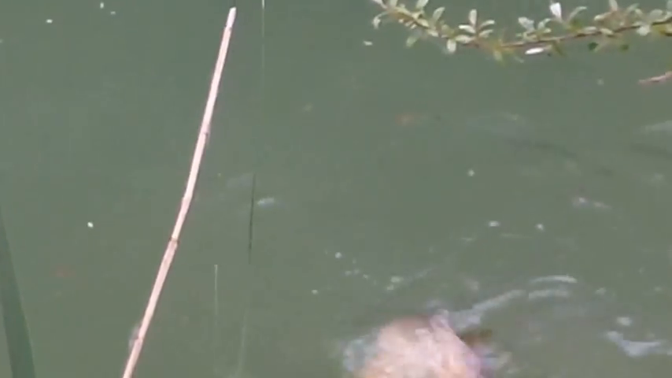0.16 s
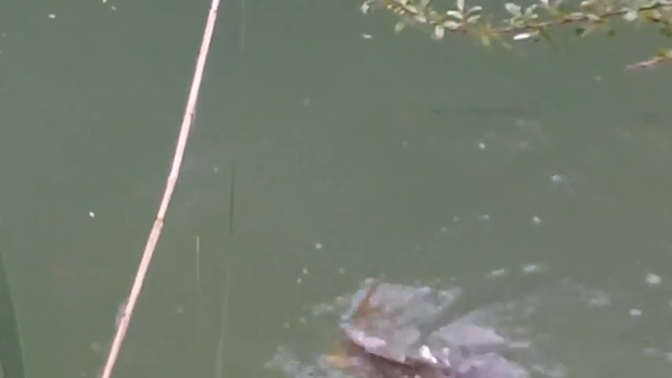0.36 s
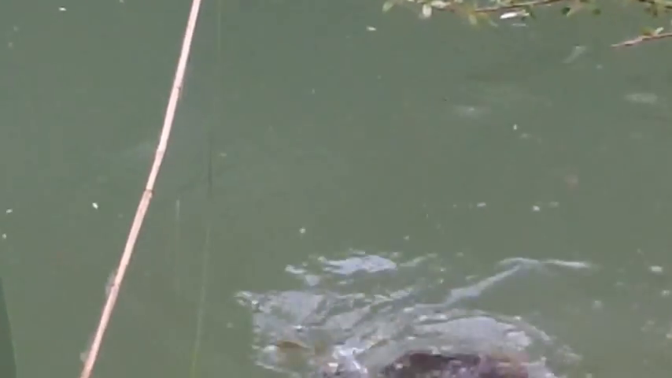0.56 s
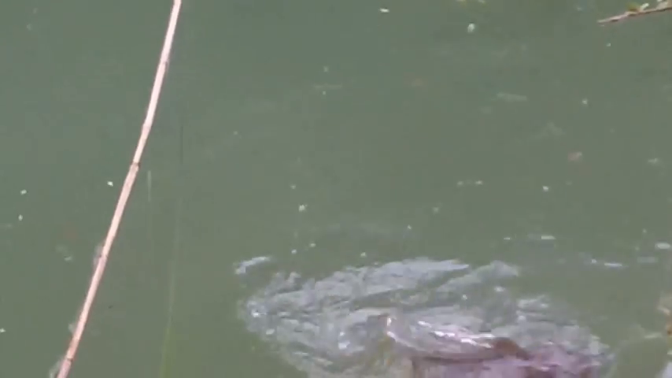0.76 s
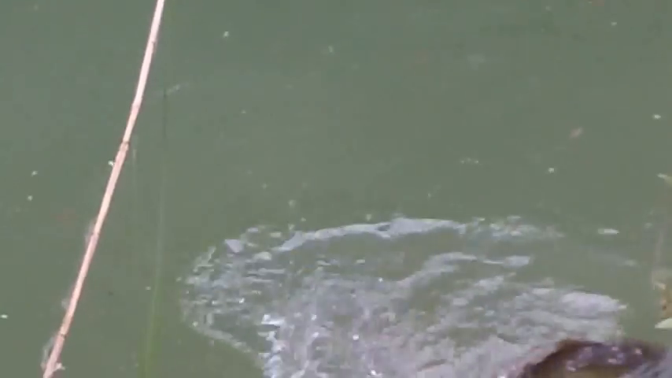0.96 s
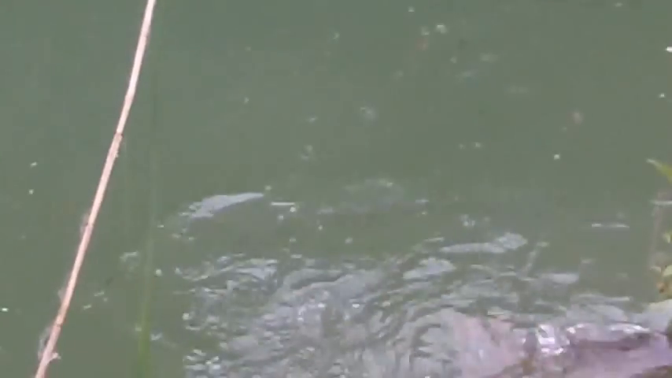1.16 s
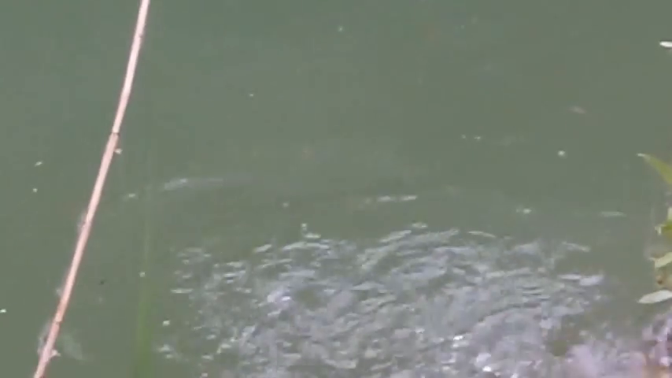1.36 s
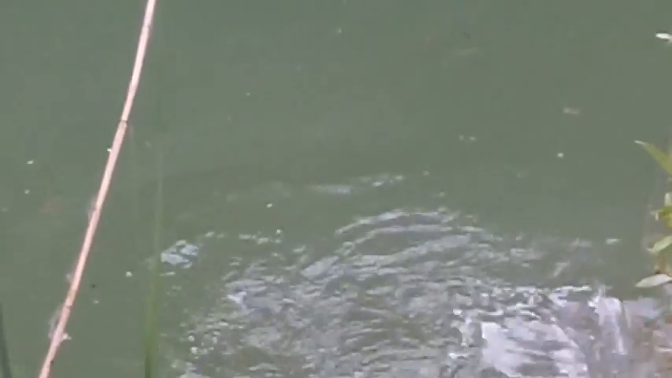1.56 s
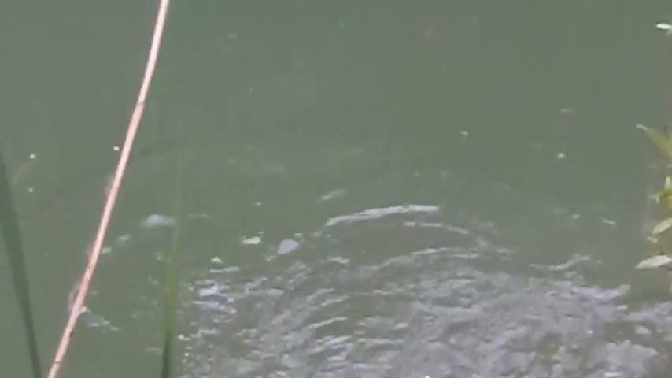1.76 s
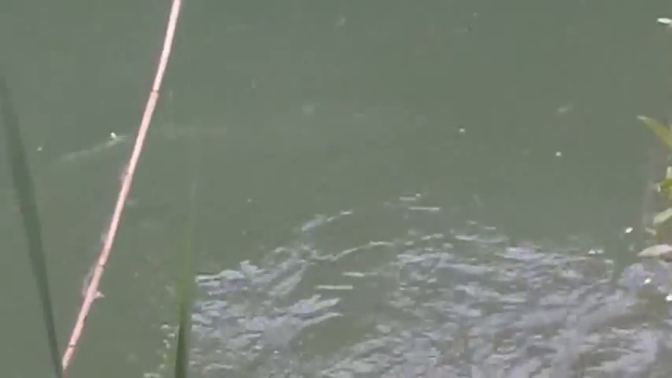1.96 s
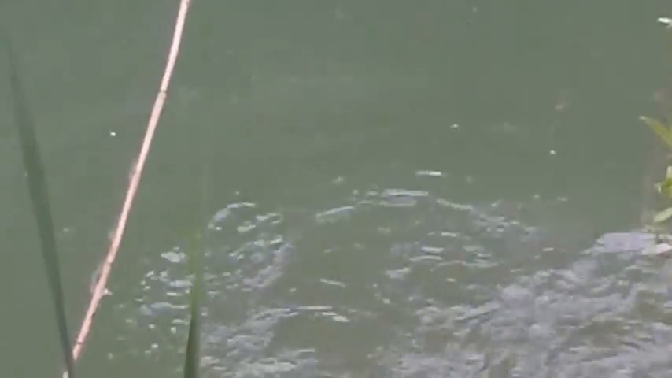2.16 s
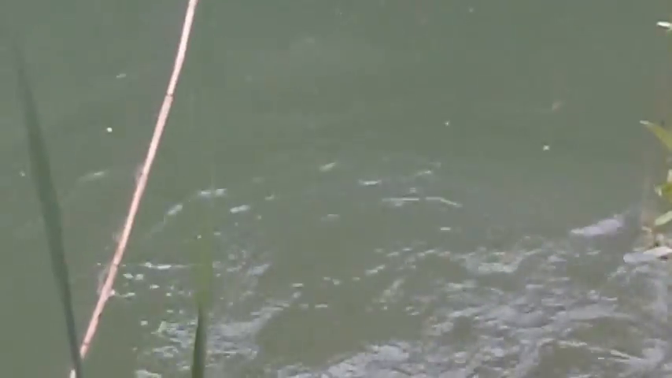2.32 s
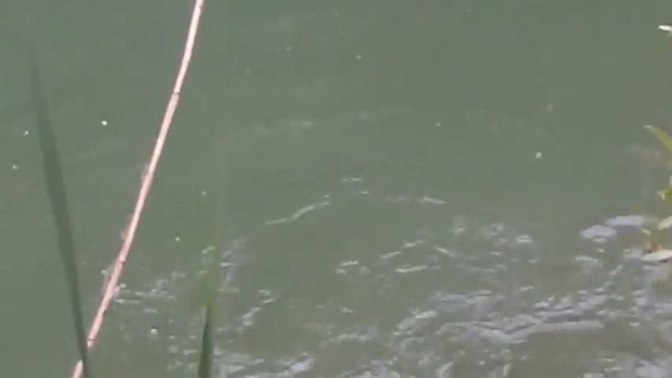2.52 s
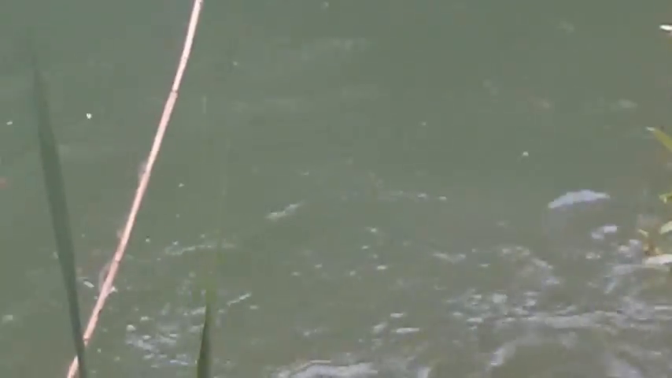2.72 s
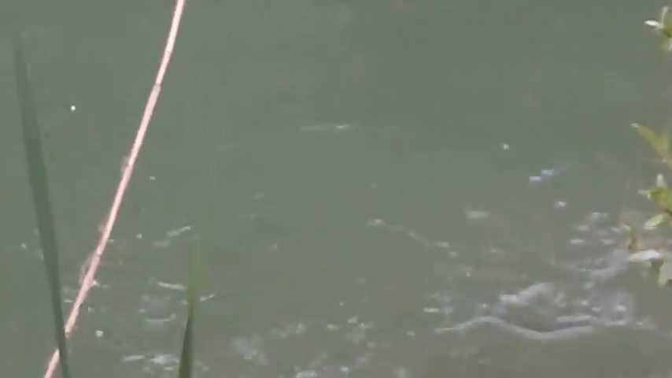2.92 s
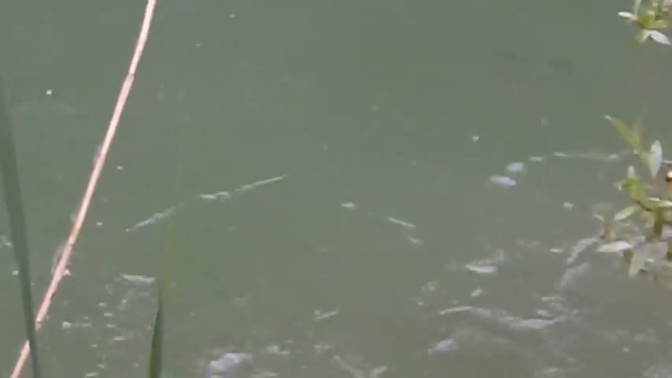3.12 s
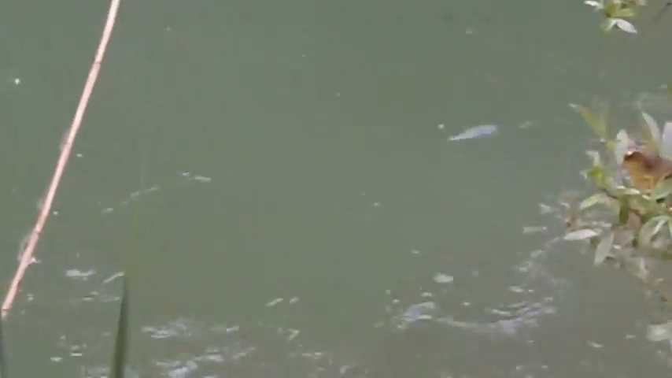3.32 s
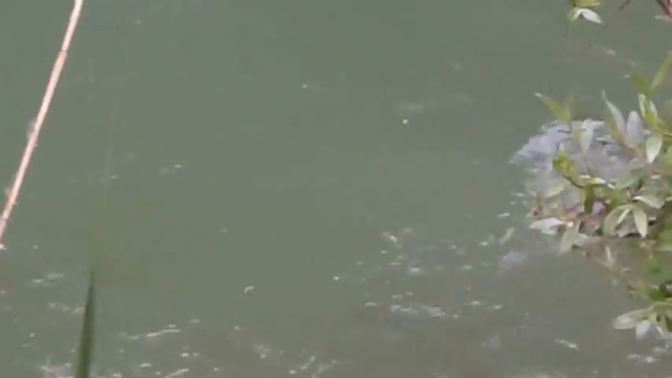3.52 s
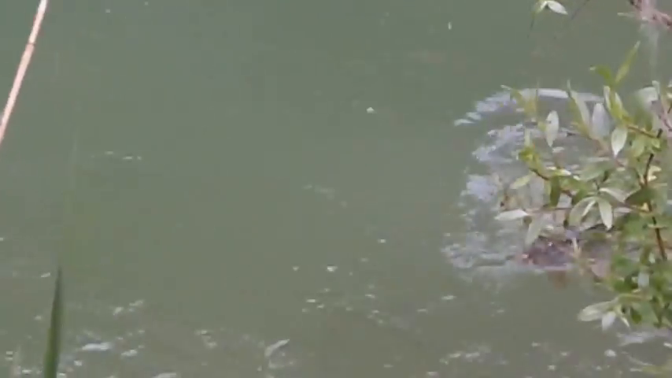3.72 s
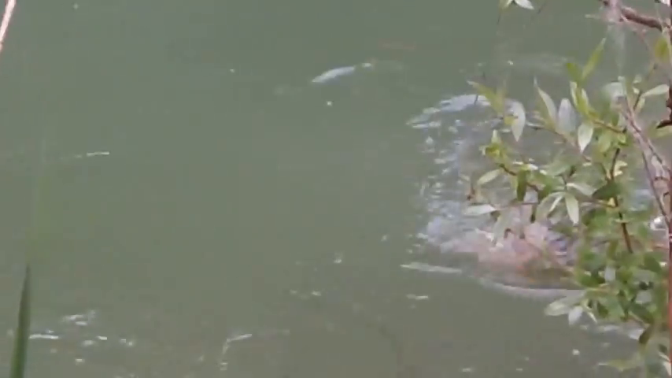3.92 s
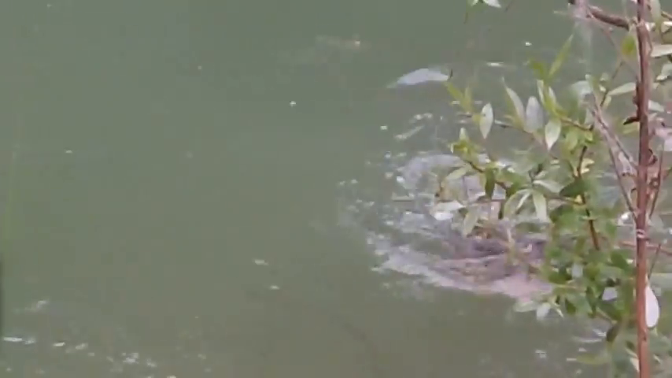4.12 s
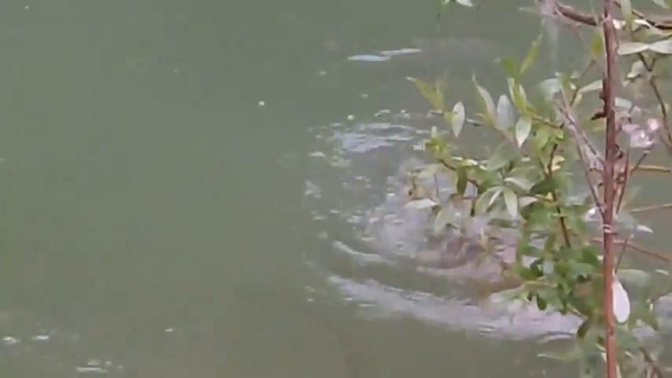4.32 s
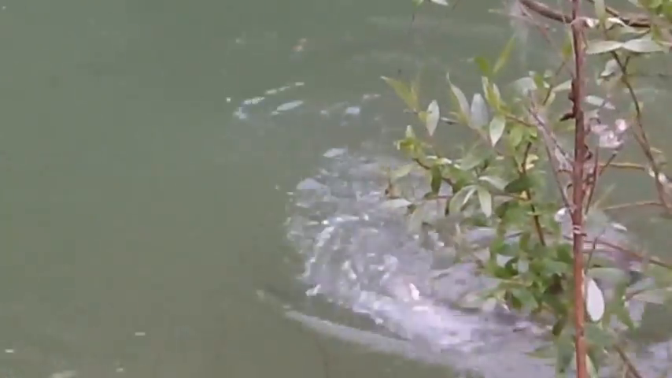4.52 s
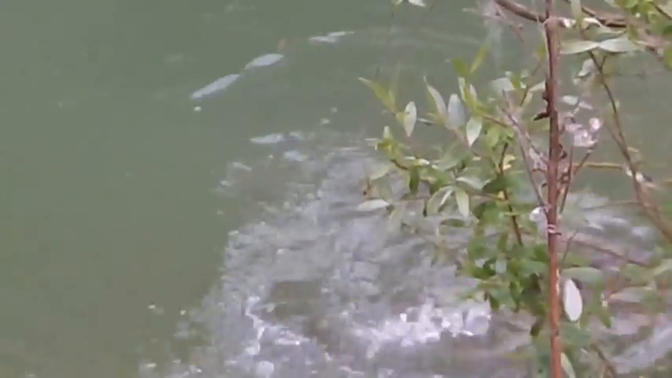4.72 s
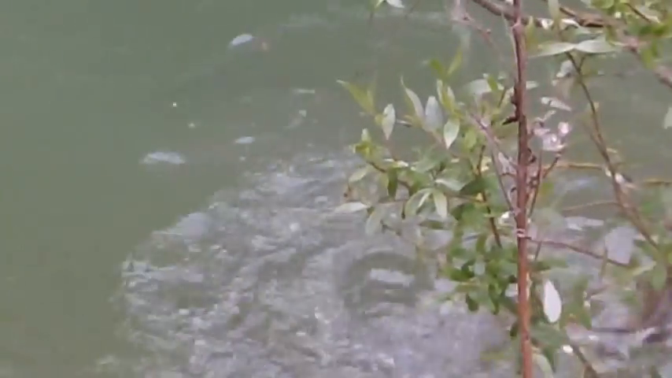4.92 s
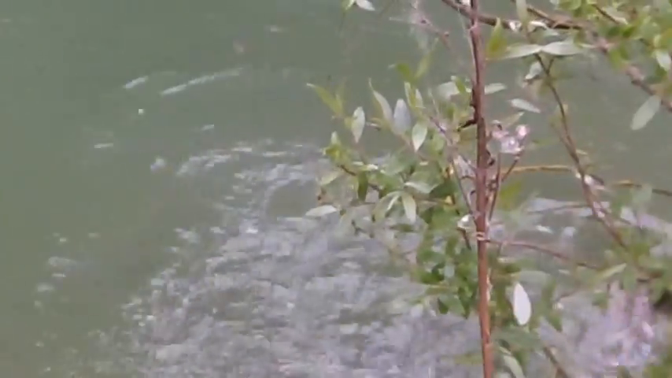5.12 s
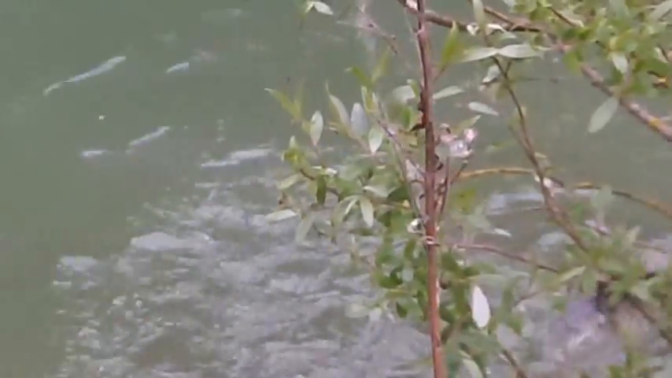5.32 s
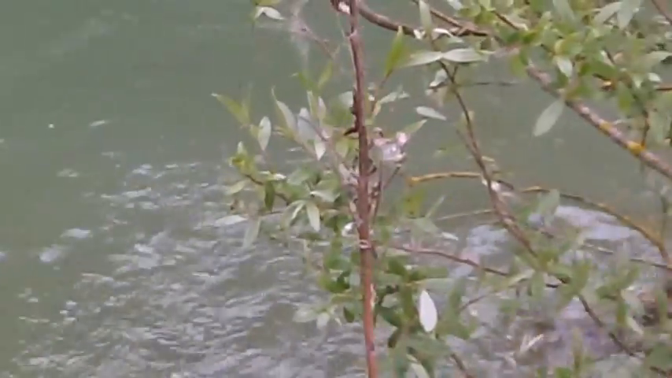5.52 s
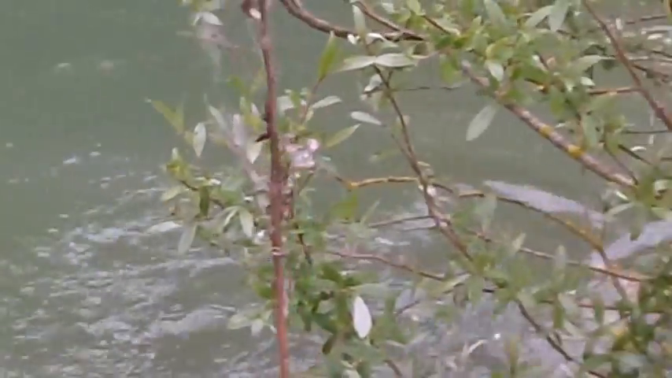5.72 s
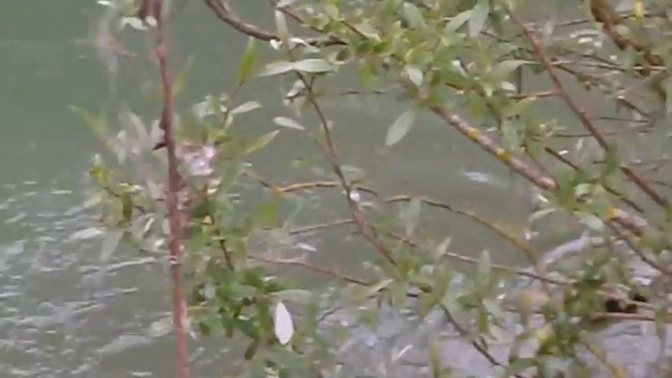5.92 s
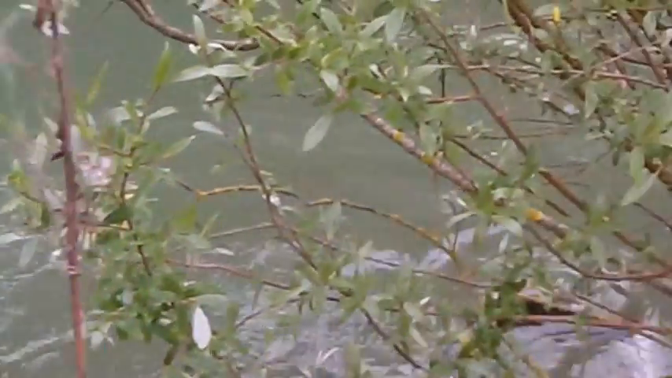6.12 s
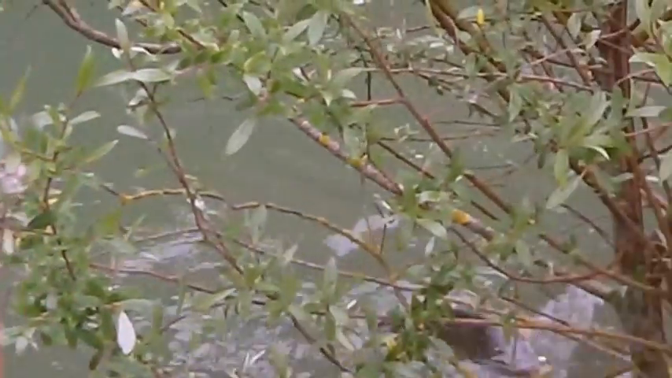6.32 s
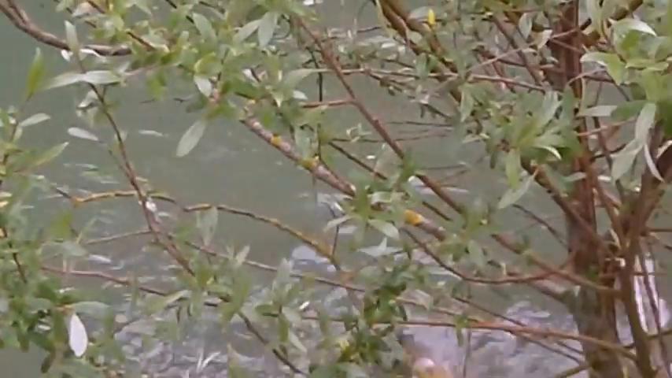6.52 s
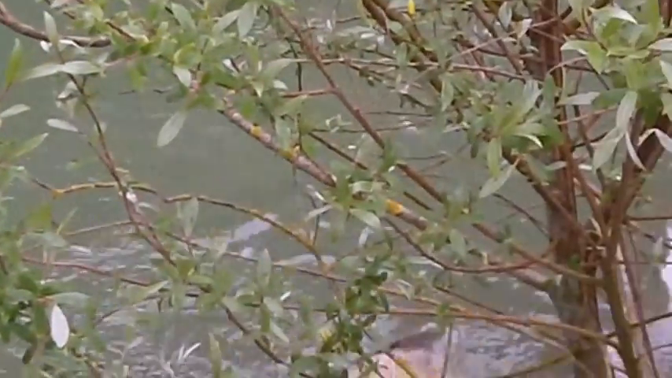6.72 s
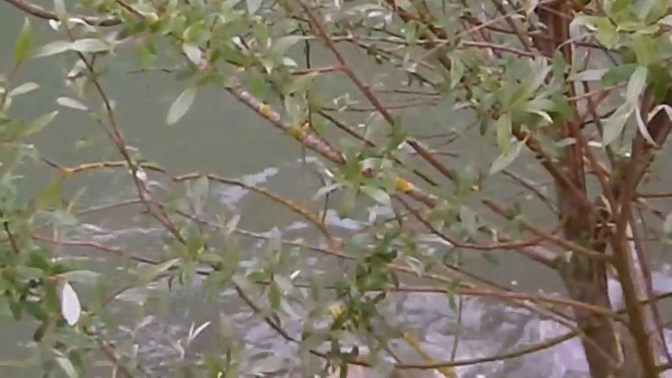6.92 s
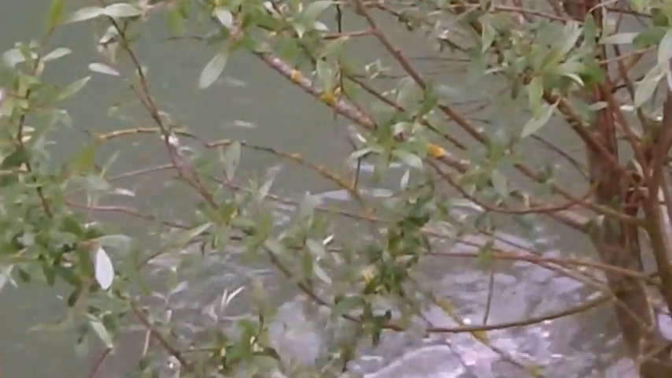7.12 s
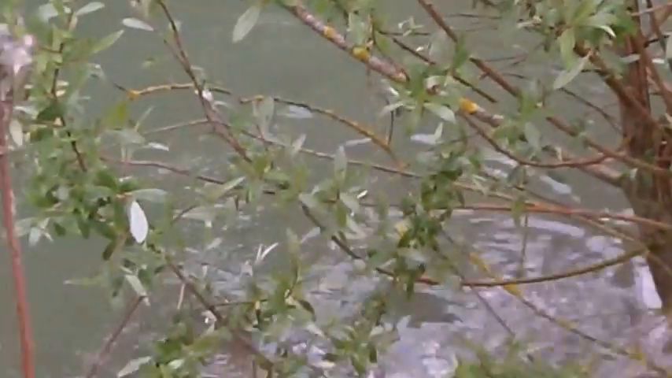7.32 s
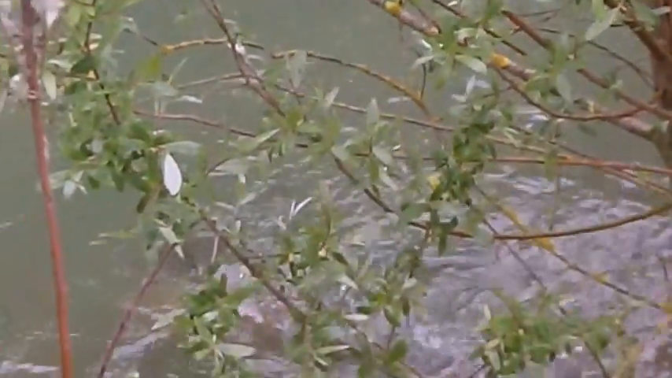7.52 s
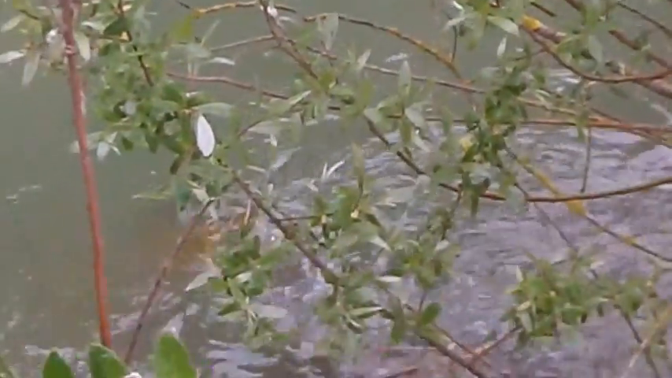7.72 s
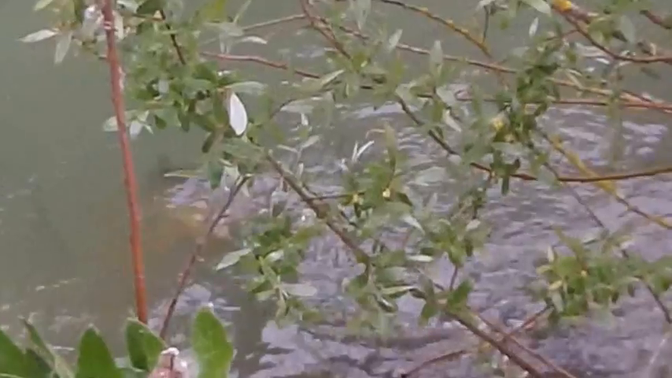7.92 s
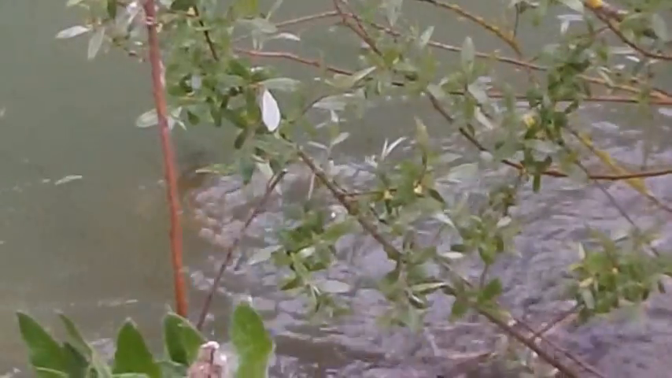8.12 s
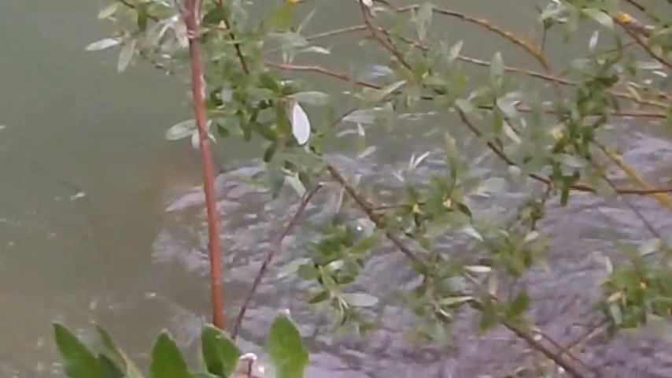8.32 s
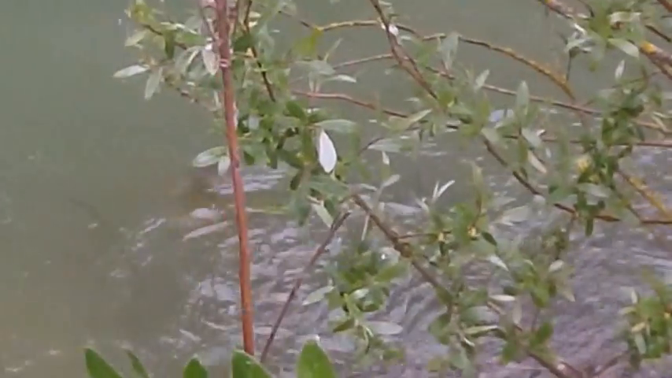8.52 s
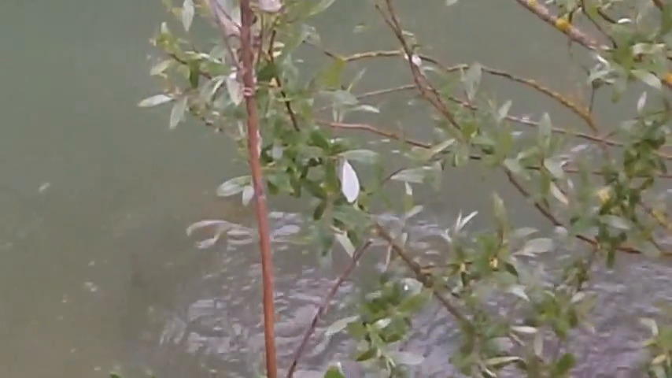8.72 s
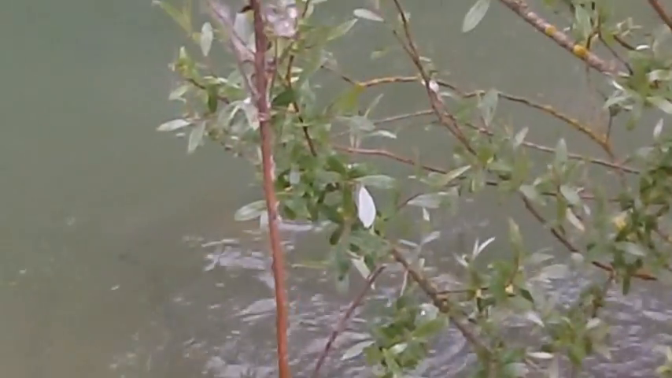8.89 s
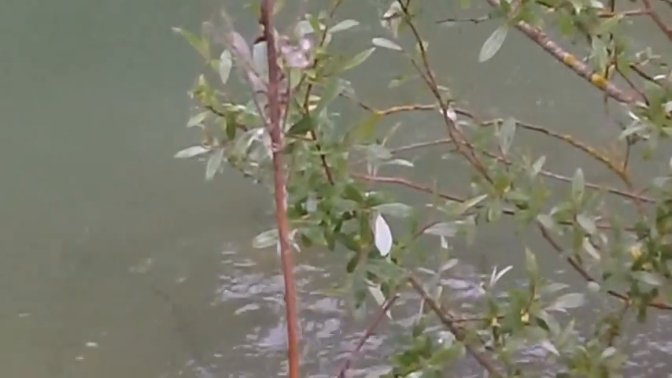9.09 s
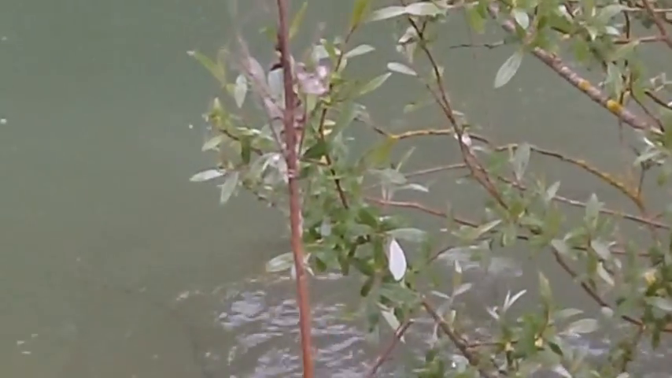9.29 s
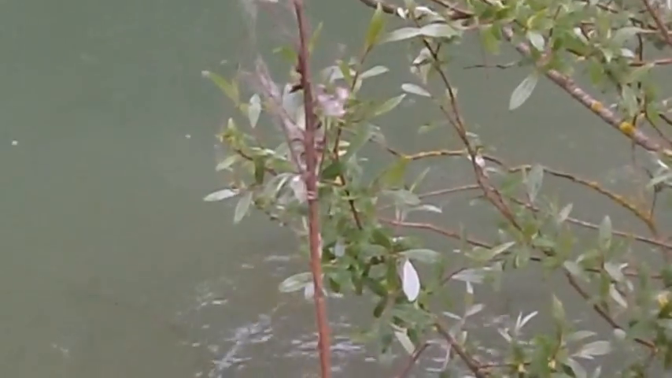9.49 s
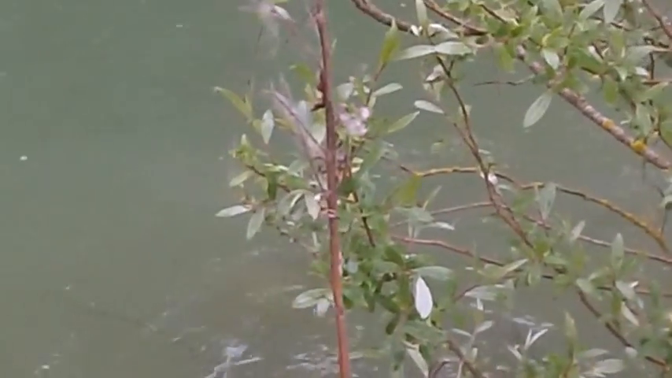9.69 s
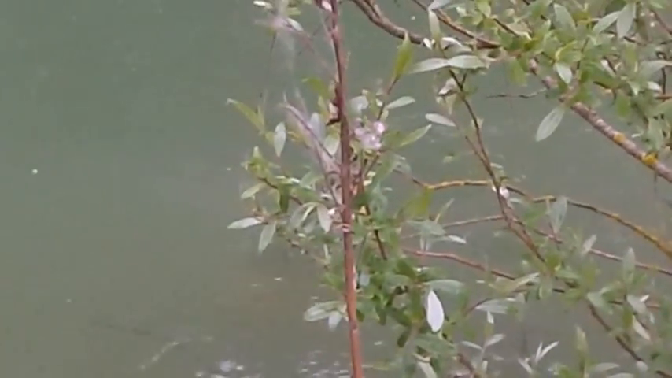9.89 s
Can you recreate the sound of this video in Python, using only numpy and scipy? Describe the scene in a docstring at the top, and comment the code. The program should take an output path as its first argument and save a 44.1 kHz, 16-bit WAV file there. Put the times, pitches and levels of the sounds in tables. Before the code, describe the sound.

A hooked fish splashes close by in a slow river, over a soft, even rush of water and a faint hiss. A first splash with sharp plops comes at about 0.3 seconds. Stronger thrashing follows from 1 to 2.2 seconds, with gurgles, a rising gulp and fizzing spray, then a short lull. Lighter sloshes and plops start at about 3.3 seconds and build to a heavy splash with a soft low thud near 4.7 seconds, churning on until 6. Another strong bout runs from 7 to 7.9 seconds, with a gulp and a loud plop around 7.4, then thins to a few drops. A fishing reel gives faint, isolated metallic ticks throughout. From 8.8 to 9.5 seconds it is wound briefly with a soft gear whirr, and one more tick sounds over the quiet river just before 10 seconds.

```python
"""Splashing close by: a hooked fish thrashes in bouts at the surface of a slow river.
Air pockets gulp and rise in pitch, bubbles plop, drops smack and the churned water fizzes.
The reel in the angler's hand ticks and is wound briefly near the end. One microphone on the
leafy bank hears it all over the quiet river and the hiss of its own electronics."""
import sys
import numpy as np
from scipy import signal
from scipy.io import wavfile
from scipy.ndimage import uniform_filter1d

SR = 44100
rng = np.random.default_rng(int(sys.argv[2]) if len(sys.argv) > 2 else 0)


def store_pcm(level_fs):
    """Save levels as 16-bit WAV."""
    pcm = np.round(np.clip(level_fs, -1, 1) * 32767).astype(np.int16)
    wavfile.write(sys.argv[1], SR, np.atleast_2d(pcm).T)


N = 438789


def amp(db):
    return 10 ** (np.asarray(db) / 20)


def unit_rms(x):
    return x / np.sqrt(np.mean(x ** 2) + 1e-20)


def curve_at(points, hz):
    """Read a curve along a logarithmic frequency axis."""
    points_hz, db = np.transpose(points)
    return np.interp(np.log(hz + 1), np.log(points_hz + 1), db)


def add(mix, start_s, sound):
    part = mix[round(start_s * SR):][:len(sound)]
    part += sound[:len(part)]


def resonate(x, hz, width_hz):
    """A two-pole resonance of gain 1."""
    return signal.lfilter(*signal.iirpeak(hz, hz / width_hz, SR), x)


def bubble(hz, peak_s, rise):
    """Trapped air rings; a positive rise lifts its pitch as it nears the surface."""
    age = np.arange(int(7 * peak_s * SR)) / SR / peak_s
    envelope = (age * np.exp(1 - age)) ** 0.91
    return envelope * np.sin(2 * np.pi * hz * peak_s * (age + rise * age ** 2 / 8))


def swarm(clumps, lo_hz, hi_hz, per_s, peak_cycles, spread_db, rise):
    """Many random bubbles, born in clumps; a few are much louder than the rest."""
    pitches = np.geomspace(lo_hz, hi_hz, num=24)
    chance, size, pick = rng.random((3, N))
    births = amp(-spread_db * np.log(size + 0.0098)) * (chance < clumps * per_s / SR)
    pitch_index = (pick * len(pitches)).astype(int)
    out = np.zeros(N)
    for k, hz in enumerate(pitches):
        ring = bubble(hz, peak_cycles / hz, rise)
        out += signal.oaconvolve(births * (pitch_index == k), ring / np.linalg.norm(ring))[:N]
    return unit_rms(out)


def churn():
    """Large, middling and tiny bubbles, all following how hard the fish stirs the water."""
    # One curve per bout. Each row: time in seconds, stirring in dB, spray in dB above the stirring.
    bouts = [
        [(0, -58.5, -8), (0.25, -54, 2.5), (0.4, -54.5, 1), (0.6, -53, -6), (0.8, -56.5, -3)],
        [(0.9, -55.5, -0.5), (1.12, -43.5, -3), (1.2, -45.5, -4), (1.3, -52.5, -2.5), (1.5, -45.5, -1.5),
         (1.58, -45, 5), (1.85, -50.5, 0), (2.2, -56, 1.5), (2.45, -69, 0)],
        [(3.25, -84, 8), (3.4, -52, -2.5), (3.55, -59.5, 1), (3.7, -61, 2), (3.95, -67, 2), (4.1, -56, -0.5),
         (4.25, -51, -9), (4.4, -63, -3)],
        [(4.5, -53, -2), (4.65, -57, 5), (4.73, -40, -6.5), (4.82, -41.5, -3.5), (4.92, -48.5, -3),
         (5.15, -49, -1.5), (5.27, -47.5, 4), (5.4, -54, -3.5), (5.65, -68.5, 10), (5.82, -50.5, 3),
         (5.95, -56, -5), (6.15, -65, -8)],
        [(6.55, -70, 8), (6.7, -57.5, -3), (6.85, -57, -12), (7, -61, 1), (7.08, -53, 5.5), (7.2, -49, -4.5),
         (7.33, -42.5, 0), (7.5, -43.5, -7), (7.75, -53.5, -1), (7.9, -57, 3), (8.1, -73, 11)],
    ]
    # Offset of the large bubbles in dB, one for each bout.
    gurgle_offsets = [-0.36, 0.24, 0.25, -2.1, -0.2]
    calm_db, gurgle_share, gurgle_lag_s = -60, 0.97, 0.017  # large bubbles swing less and come later
    times, stir_db, spray_db = np.concatenate(bouts).T
    offset_db = np.repeat(gurgle_offsets, [len(bout) for bout in bouts])
    gurgle_db = calm_db + offset_db + gurgle_share * (stir_db - calm_db)
    surge = unit_rms(uniform_filter1d(uniform_filter1d(rng.standard_normal(N), size=300), size=300))
    clumps = amp(4 * surge)  # thrown water lands in handfuls
    clumps /= clumps.mean()
    gurgle = swarm(clumps, 415.3, 1036, per_s=400, peak_cycles=2.85, spread_db=2.45, rise=0.357)
    babble = swarm(clumps, 1010, 2493, per_s=1100, peak_cycles=2.49, spread_db=4.2, rise=0.37)
    spray = swarm(clumps, 2420, 5700, per_s=3500, peak_cycles=1.04, spread_db=3.5, rise=0.21)
    t = np.arange(N) / SR
    return (amp(np.interp(t - gurgle_lag_s, times, gurgle_db)) * gurgle
            + amp(np.interp(t, times, stir_db)) * babble
            + amp(np.interp(t, times, stir_db + spray_db)) * spray)


def air_pockets():
    """Pockets of air close behind the tail, each a gulp that glides upward."""
    # Each row: start and length in seconds, first and last pitch in Hz, level at the peak in dB,
    # place of the peak as a share of the length.
    pockets = [(1.033, 0.047, 438, 598, -49, .3), (1.241, 0.073, 271, 716, -29.5, 0.58),
               (1.303, .025, 830, 960, -36.5, .52), (1.612, 0.042, 566, 710, -43, 0.32),
               (3.43, 0.067, 381, 637, -49, 0.33), (3.526, .02, 1520, 2100, -46, .3),
               (3.56, 0.022, 1420, 2410, -45, .3), (4.239, 0.041, 465, 640, -48, 0.27),
               (5.407, 0.033, 554, 685, -47, 0.27), (6.66, 0.044, 503, 724, -49.5, 0.33),
               (6.807, .075, 456, 900, -52, .4), (7.102, 0.1, 149, 152, -39, 0.082),
               (7.143, 0.024, 247, 255, -39, 0.49), (7.172, 0.047, 283, 707, -29.5, 0.53),
               (7.212, 0.029, 640, 880, -40, .15), (7.235, .09, 150, 243, -48.5, 0.45),
               (7.255, 0.046, 380, 475, -41.5, 0.29)]
    out = np.zeros(N)
    for start_s, length_s, first_hz, last_hz, peak_db, peak_at in pockets:
        progress = np.arange(0, length_s, 1 / SR) / length_s
        hz = first_hz * (last_hz / first_hz) ** progress
        tone = np.sqrt(2) * np.sin(2 * np.pi * np.cumsum(hz) / SR)
        swell_db = np.interp(progress, [0, peak_at, 1], [-14.5, 0, -9.5])
        add(out, start_s, amp(peak_db + swell_db) * tone * signal.windows.tukey(len(tone), 0.08))
    return out


def plops():
    """Single bubbles ring out above the churn, wobbling as their walls shake."""
    # Each row: start in seconds, level in dB, pitch in Hz, time to peak in milliseconds.
    bubbles = [(0.3048, -33.5, 488, 11.7), (0.3197, -23, 560, 1.4), (0.3333, -19, 1130, 1.2),
               (0.3474, -38, 520, 10.3), (0.3666, -38.5, 936, 4.2), (0.379, -31.5, 1770, 0.61),
               (0.5877, -41.5, 577, 5), (0.6992, -41, 755, 2.3), (0.956, -38, 1350, 3.1),
               (1.0243, -39, 1360, 2.2), (1.104, -24.5, 850, 1.5), (1.1045, -18.5, 2300, 0.46),
               (1.156, -17, 2340, 0.5), (1.3813, -40, 590, 9.2), (1.4168, -35.5, 595, 6.7),
               (1.4787, -36.5, 673, 6.8), (1.5204, -21, 594, 5.5), (1.5304, -26, 2500, 0.96),
               (1.5413, -29, 910, 2.8), (1.5836, -38, 594, 6.5), (1.5974, -29, 1800, 1.1),
               (1.6185, -30, 1910, 2.2), (1.6224, -24, 2550, 1.2), (1.7006, -35, 613, 2.6),
               (1.7117, -34, 1800, 1.6), (1.8724, -33, 2350, 0.7), (1.89, -29.5, 3380, 0.43),
               (1.9146, -40, 640, 6.8), (1.9495, -36, 2480, 1.6), (2.1344, -36.5, 1770, 2.3),
               (2.3538, -37, 2600, 0.75), (3.3716, -35.5, 990, 3.3), (3.4016, -36, 1080, 2),
               (3.4233, -41, 1160, 1.6), (3.4533, -40, 1170, 2.3), (3.5568, -41, 1084, 7.8),
               (3.608, -40, 2620, 2.9), (3.643, -39, 1520, 4), (3.7606, -43, 596, 4.6),
               (4.0281, -35, 2600, 1.1), (4.084, -32, 1543, 4.8), (4.119, -32.5, 1550, 1.3),
               (4.1644, -38, 560, 2.3), (4.1792, -43, 510, 9.4), (4.2014, -38, 510, 6),
               (4.2337, -35.5, 1050, 1.7), (4.25, -39, 1595, 4.3), (4.265, -38, 1075, 2.5),
               (4.2898, -38, 473, 7.8), (4.4996, -41.5, 670, 4.9), (4.5389, -34.5, 2380, 1.1),
               (4.6891, -38.5, 512, 13), (4.716, -25, 502, 3.5), (4.7545, -27.5, 3800, 0.86),
               (4.7582, -36, 630, 4.3), (4.7768, -23.5, 444, 5.9), (4.8253, -31, 587, 5.6),
               (4.868, -39, 655, 3.7), (4.8865, -32, 3270, 1.2), (4.9744, -32.5, 1010, 3),
               (4.9888, -30.5, 1510, 1.5), (5.0201, -34, 1960, 2), (5.0804, -32.5, 3280, 0.95),
               (5.0961, -38.5, 607, 8.4), (5.1377, -29, 3450, 1), (5.1435, -43.5, 434, 10),
               (5.1598, -37, 965, 3.4), (5.2302, -40, 604, 8.9), (5.2628, -33, 1790, 3.1),
               (5.286, -40, 908, 4.8), (5.3286, -41.5, 990, 4.7), (5.4162, -31.5, 881, 5.9),
               (5.469, -41, 880, 6.3), (5.4888, -42, 613, 6.3), (5.64, -40.5, 2670, 3),
               (5.6582, -43, 854, 3.2), (5.7837, -27.5, 3350, 0.86), (5.8246, -37.5, 930, 6),
               (5.881, -49, 570, 8.8), (5.8917, -36, 2180, 0.93), (5.9392, -44, 660, 4.8),
               (6.022, -33, 3370, 1.4), (6.248, -43.5, 1340, 2.8), (6.9785, -45, 1170, 3.7),
               (6.9836, -47, 604, 6.5), (7.0402, -32.5, 898, 3.7), (7.048, -27.5, 2110, 1.6),
               (7.0908, -35, 1230, 3.3), (7.2394, -34, 1344, 4.4), (7.2635, -38.5, 842, 7.8),
               (7.3482, -25.5, 955, 2.7), (7.3507, -35, 574, 4), (7.376, -32, 1680, 3.9),
               (7.3919, -30.5, 950, 3.1), (7.4186, -39, 395, 10), (7.441, -27, 953, 5),
               (7.4493, -13.5, 774, 1.75), (7.4498, -18, 1803, 0.53), (7.451, -28, 3070, 1.1),
               (7.453, -29, 240, 6.2), (7.5289, -34, 870, 2.6), (7.572, -32.5, 1730, 2.9),
               (7.6415, -26, 3550, 0.34), (7.7967, -30, 870, 1.9), (7.7965, -29, 1600, 0.67),
               (7.8004, -25, 2950, 0.26), (7.8582, -50, 493, 8.4), (7.887, -30.5, 3020, 0.68)]
    out = np.zeros(N)
    for start_s, db, hz, peak_ms in bubbles:
        noise = rng.standard_normal(6000)
        ring = bubble(hz, peak_ms / 1000, rise=0.14 * (1 + 0.67 * noise[-1]))[:len(noise)]
        wobble = unit_rms(uniform_filter1d(noise, size=int(SR / hz)))[:len(ring)]
        add(out, start_s, amp(db) * ring * (1 + 0.4 * wobble))
    return out


def drops():
    """Drops smack the surface: a narrow ping inside a broad burst of spatter."""
    # Each row: time in seconds, relative level in dB, centre of the ping in Hz.
    landings = [(0.1146, -29.5, 5360), (0.1324, -32.5, 4200), (0.157, -27, 2700), (0.19, -30.5, 2780),
                (0.2167, -33.5, 2660), (0.234, -35, 2300), (0.309, -24, 2200), (0.379, -29, 2240),
                (0.701, -31.5, 3650), (1.057, -36, 4040), (1.514, -32, 2590), (1.745, -32, 3080),
                (1.7693, -32.5, 2260), (1.8506, -35, 2340), (2.1171, -33, 4100), (2.6092, -32.5, 4500),
                (3.3228, -37, 3490), (3.4264, -32.5, 4280), (3.627, -32.5, 3300), (3.697, -36.5, 4860),
                (3.9904, -29.5, 3950), (4.26, -35.5, 2840), (4.6558, -32.5, 2230), (4.713, -29, 2100),
                (4.7743, -28, 2180), (5.064, -34, 3380), (5.224, -27.5, 4360), (5.442, -35, 4300),
                (6.466, -38, 3890), (6.669, -32, 4750), (7.104, -31, 2130), (7.2907, -26, 5170),
                (7.31, -26.5, 4260), (7.443, -30, 2180), (7.655, -24, 5400), (7.751, -38, 2520),
                (8.0047, -35, 4100), (8.2302, -39, 4400), (8.317, -35.5, 2840)]
    peak_s = 0.0015
    age = np.arange(1500) / SR / peak_s
    envelope = (age * np.exp(1 - age)) ** 0.65
    out = np.zeros(N)
    for time_s, db, hz in landings:
        noise = rng.standard_normal(len(age))
        ping = unit_rms(resonate(noise, hz, 0.076 * hz))
        spatter = unit_rms(resonate(resonate(noise, 2700, 4900), 2700, 4900))
        add(out, time_s - 0.0007, amp(db - 10) * (ping + 0.98 * spatter) * envelope)
    return out


def body_slaps():
    """The fish's body pushes the water: low thuds that sag in pitch."""
    # Each row: time in seconds, level in dB, pitch in Hz.
    slaps = [(0.32, -38, 307), (0.332, -33.5, 217), (1.104, -37.5, 138), (1.244, -30.5, 258),
             (1.514, -44, 262), (4.775, -27, 277), (7.105, -33, 200)]
    out = np.zeros(N)
    for time_s, db, hz in slaps:
        add(out, time_s - 0.002, amp(db) * bubble(hz, peak_s=0.42 / hz, rise=-0.12))
    return out


def reel_ticks():
    """Each tick knocks the reel's housing and rings a metal part."""
    # Each row: start in seconds, relative level in dB, long ring in dB relative to the tick.
    ticks = [(0.496, -22, -30), (0.912, -24, -21), (3.5192, -24.5, -23), (4.563, -22.5, -37),
             (5.3418, -23, -36), (5.9637, -26, -26), (6.6373, -30, -18), (7.9803, -23, -32),
             (8.79, -23.5, -26), (9.143, -29.5, -10), (9.2957, -31.5, -4.5), (9.847, -24.5, -18)]
    # Reel modes, the long ring last. Each row: pitch in Hz, level in dB, seconds to fall by 60 dB.
    reel_modes = [(3300, -10, .008), (4150, -7, .01), (4960, 0, .014), (6300, -8, .004), (4208, 0, .26)]
    out, t = np.zeros(N), np.arange(12000) / SR
    rings = np.array([amp(db - 60 * t / t60) * np.sin(2 * np.pi * hz * t) for hz, db, t60 in reel_modes])
    attack = np.minimum(t / 0.00047, 1)
    for start_s, db, ring_db in ticks:
        strike = amp(1.8 * rng.standard_normal(len(rings)))  # no two ticks land alike
        strike[-1] = amp(ring_db)
        add(out, start_s, amp(db - 2) * (strike @ rings) * attack)
    return out


def reel_winding():
    """One turn of the handle rubs the gear teeth, louder at first, then settling."""
    # Gear resonances. Each row: centre in Hz, width in Hz, relative level in dB.
    gears = [(3160, 2900, 3), (3116, 68, -13), (4200, 860, -5)]
    start_s, length_s, rise_s, fall_s = 8.8, 0.665, 0.04, 0.07
    steady_db, extra_db, settle_s, catches_per_s = -51, 4.5, 0.1, 300
    out, t = np.zeros(N), np.arange(0, length_s, 1 / SR)
    catches = rng.random(len(t)) < catches_per_s / SR
    teeth = rng.standard_normal(len(t)) * (1 + 5.4 * catches)
    rub = sum(amp(db) * unit_rms(resonate(resonate(teeth, hz, width), hz, width))
              for hz, width, db in gears)
    level = amp(steady_db + extra_db * np.exp(-t / settle_s))
    fade = np.clip(np.minimum(t / rise_s, t[::-1] / fall_s), 0, 1)
    add(out, start_s, level * fade * unit_rms(rub))
    return out


def bank_scatter(x):
    """Leaves and twigs on the bank add a short tail, mostly of the treble."""
    t = np.arange(4000) / SR
    tail = rng.standard_normal(len(t)) * amp(-60 * t / 0.15) * (t > 0.002)
    scattered = signal.oaconvolve(resonate(x, 3100, 4600), tail / np.linalg.norm(tail))[:N]
    return x + amp(-11) * scattered


def wash(spectrum, patchy_db):
    """Noise of a given colour with drifting louder and softer patches."""
    frames, hz = N // 1024 + 5, np.fft.rfftfreq(4096, 1 / SR)
    real, imag, patches = rng.standard_normal((frames, len(hz), 3)).T
    patches = unit_rms(uniform_filter1d(uniform_filter1d(patches, size=40, axis=0), size=4, axis=1))
    bins = (real + 1j * imag) * amp(curve_at(spectrum, hz)[:, None] + patchy_db * patches)
    return unit_rms(signal.istft(bins, nperseg=4096, noverlap=3072)[1][:N])


def river():
    """Slow water passes the bank with a soft, even rush."""
    # Each row: frequency in Hz, relative spectral density in dB.
    river_colour = [(16, -33), (28, 1), (93, -4.5), (120, -8.5), (166, -11.5), (458, -10), (564, -10.5),
                    (648, -10), (1210, -11.5), (7000, -20), (9100, -22), (15400, -120)]
    return amp(-50) * wash(river_colour, patchy_db=1.2)


def scene():
    """Fish and reel as heard from the bank, in mono, with the river behind."""
    fish = churn() + air_pockets() + plops() + drops() + body_slaps()
    reel = reel_ticks() + reel_winding()
    return (bank_scatter(fish + reel) + river())[None]


def record(dry):
    """The recorder adds treble hiss, cuts a deep notch near 8 kHz and limits the band."""
    # Each row: frequency in Hz, relative spectral density in dB.
    hiss_colour = [(7000, -17), (8600, 2.5), (9800, 1.5), (12000, 1.5), (15000, 0.5), (16500, -5.5)]
    # Each row: frequency in Hz, gain in dB.
    notch_curve = [(6000, 1), (7000, -3), (7600, -13), (7880, -28), (8150, -14.5), (9000, -4.5),
                   (10000, -0.5)]
    hz = np.linspace(0, SR / 2, num=1025)
    notch = signal.firwin2(1023, hz, amp(curve_at(notch_curve, hz)) * (hz < SR / 2), fs=SR)
    lowpass = signal.firwin(2047, cutoff=15270, window=("kaiser", 9), fs=SR)
    noisy = dry + amp(-54.5) * wash(hiss_colour, patchy_db=0.95)
    notched = signal.oaconvolve(noisy, notch[None], "same")
    return signal.oaconvolve(notched, lowpass[None], "same")


dry = scene()
out = record(dry)
store_pcm(out)
```